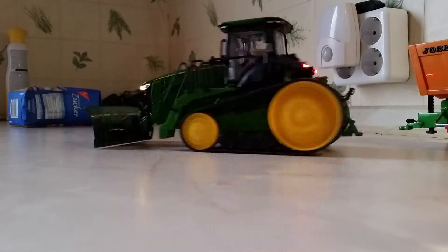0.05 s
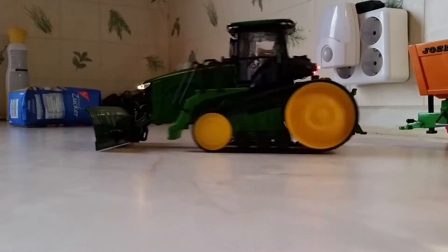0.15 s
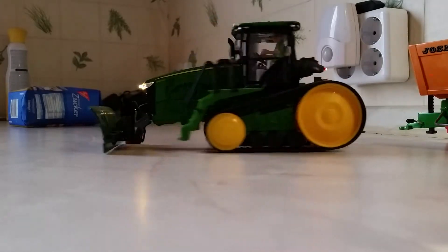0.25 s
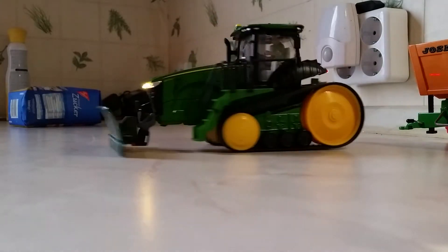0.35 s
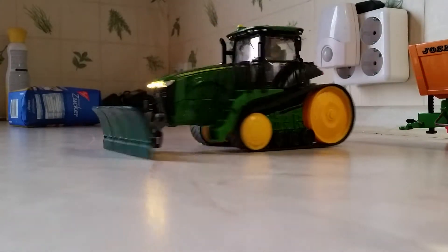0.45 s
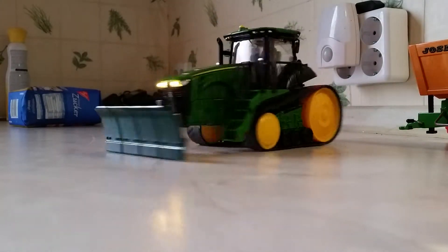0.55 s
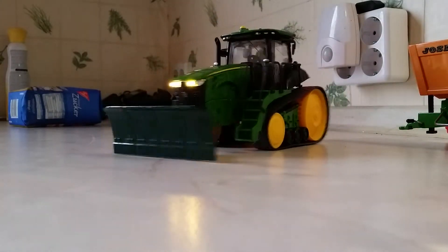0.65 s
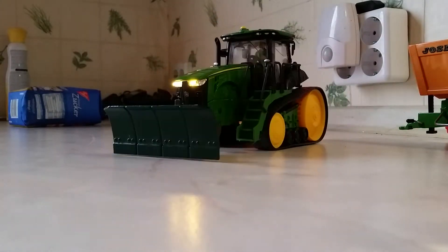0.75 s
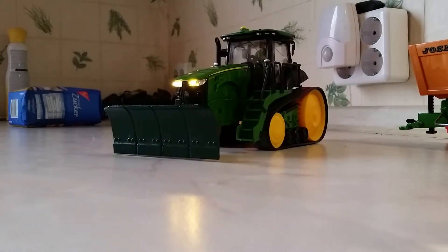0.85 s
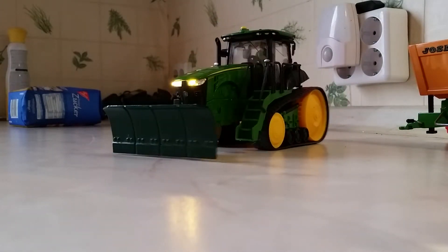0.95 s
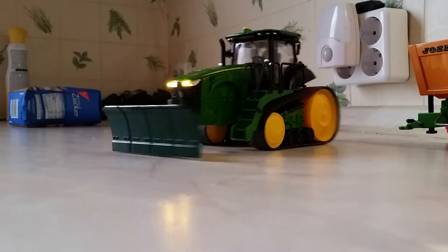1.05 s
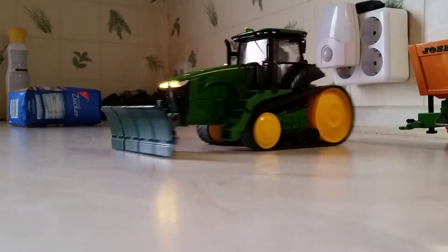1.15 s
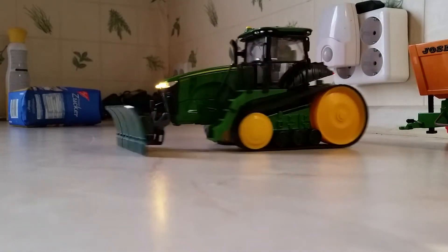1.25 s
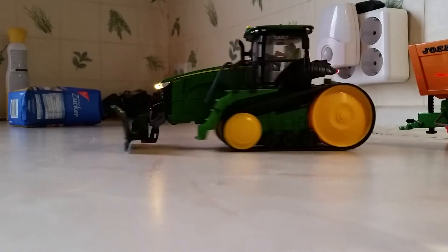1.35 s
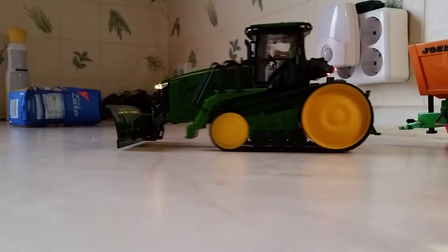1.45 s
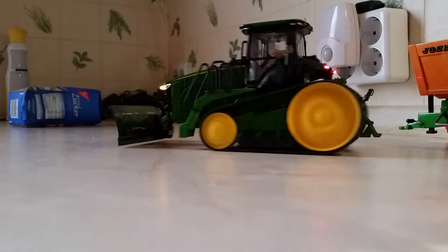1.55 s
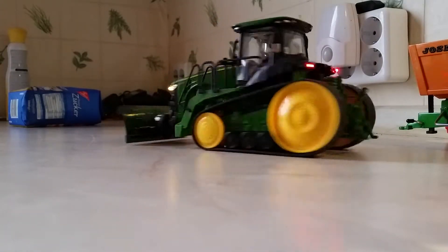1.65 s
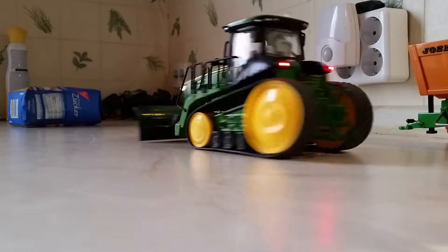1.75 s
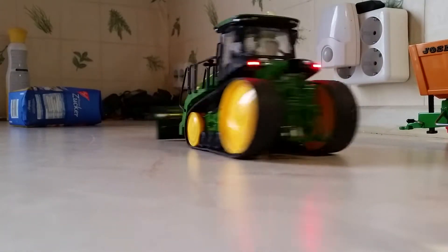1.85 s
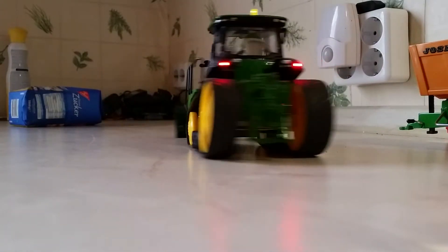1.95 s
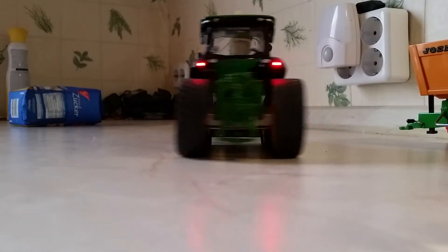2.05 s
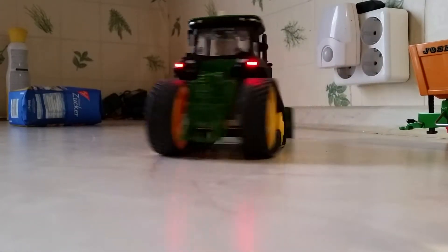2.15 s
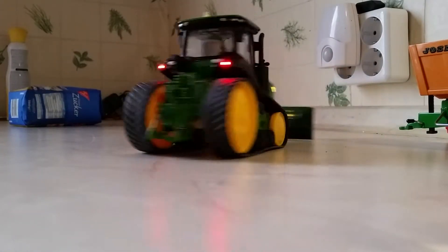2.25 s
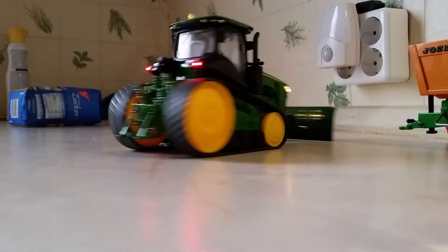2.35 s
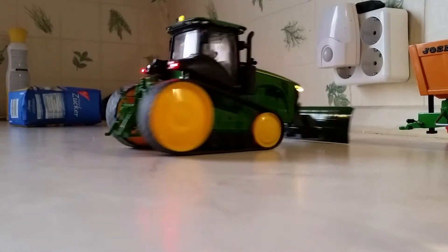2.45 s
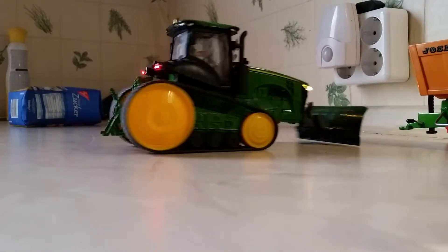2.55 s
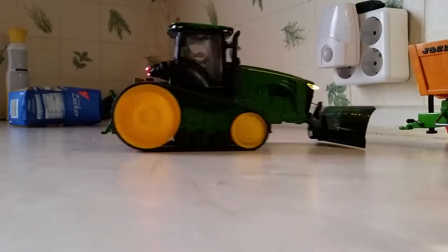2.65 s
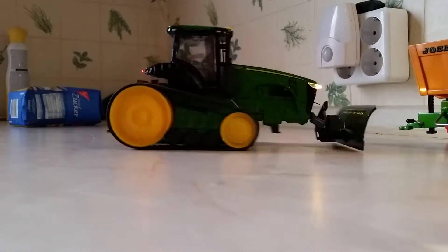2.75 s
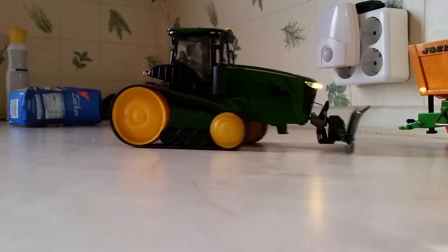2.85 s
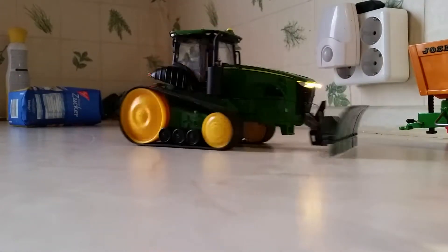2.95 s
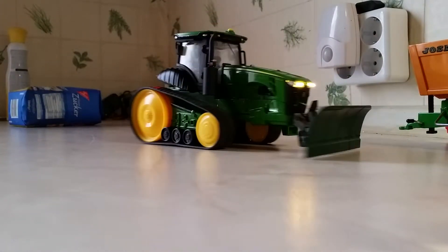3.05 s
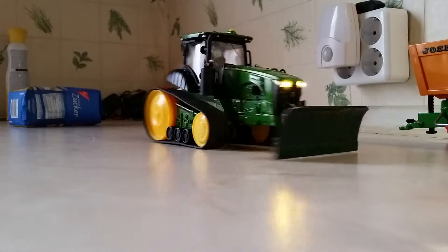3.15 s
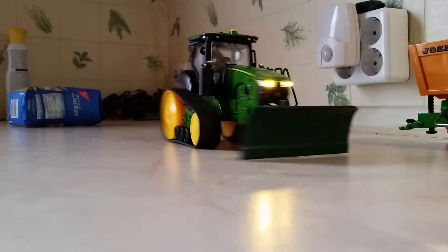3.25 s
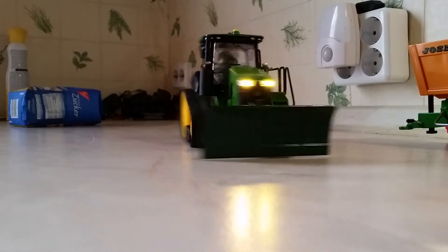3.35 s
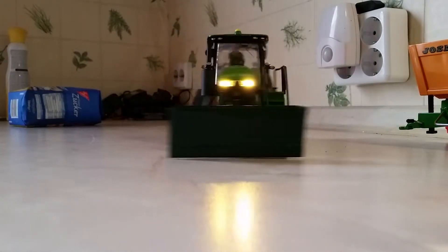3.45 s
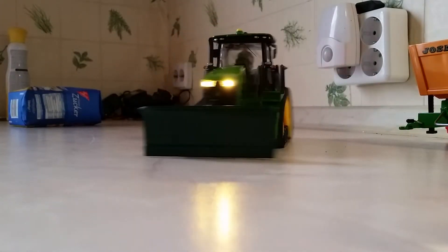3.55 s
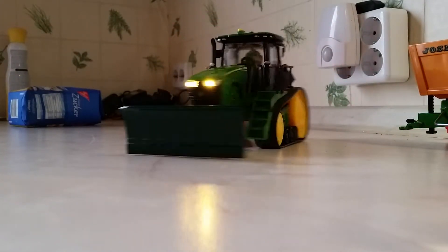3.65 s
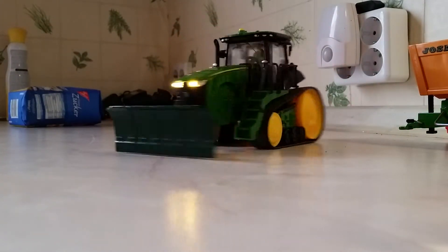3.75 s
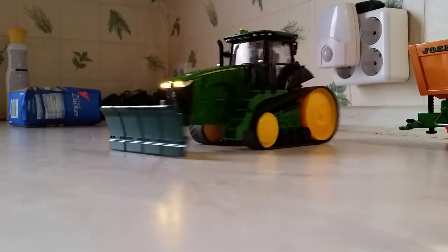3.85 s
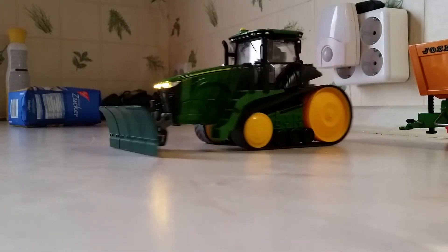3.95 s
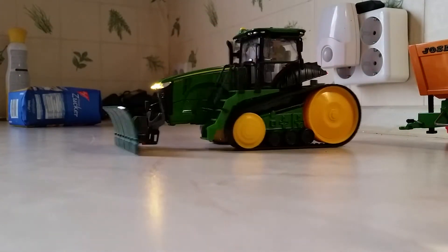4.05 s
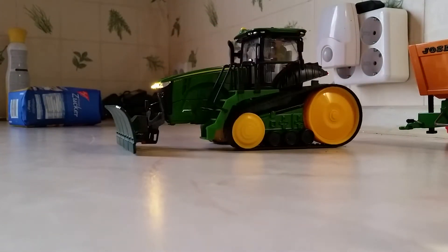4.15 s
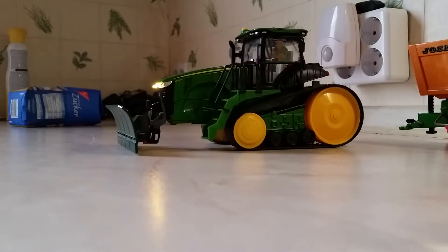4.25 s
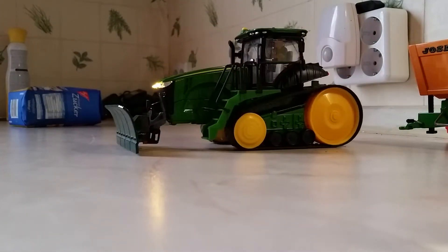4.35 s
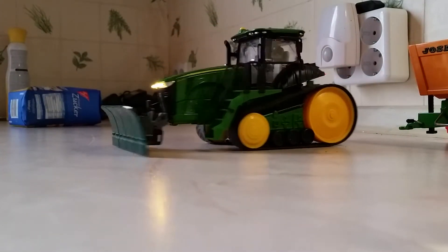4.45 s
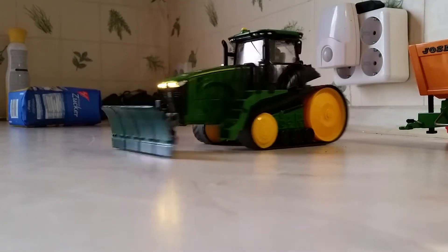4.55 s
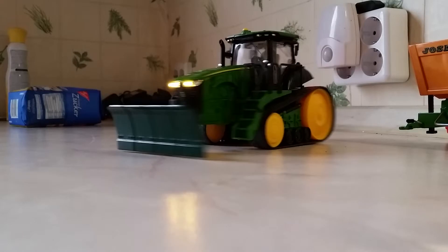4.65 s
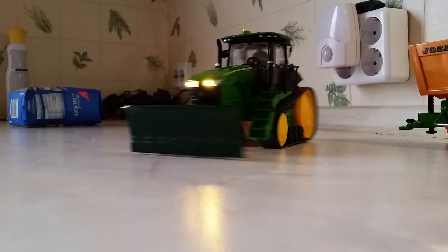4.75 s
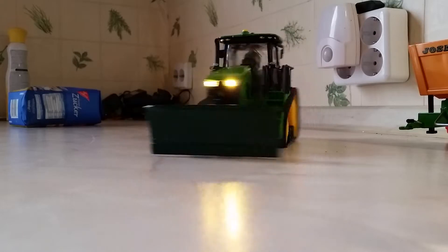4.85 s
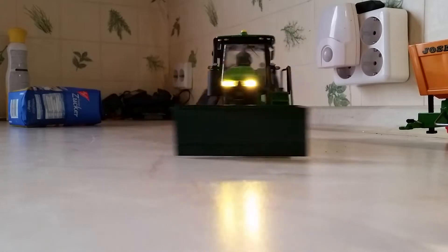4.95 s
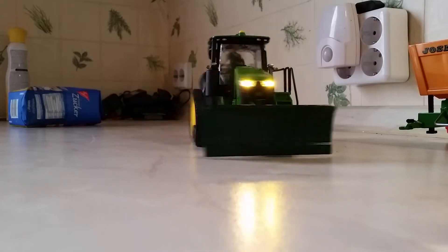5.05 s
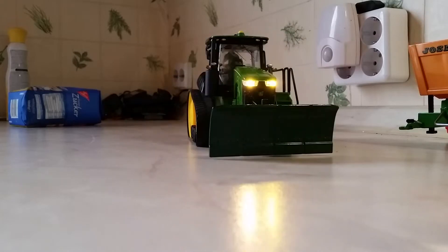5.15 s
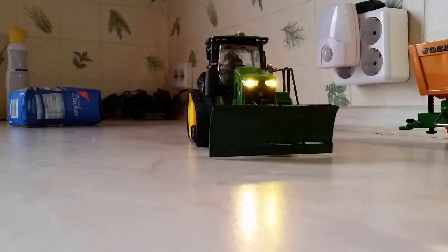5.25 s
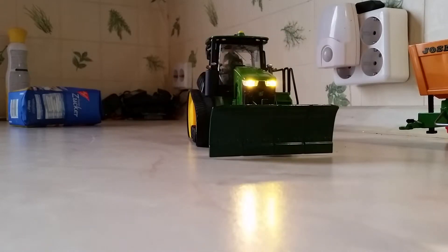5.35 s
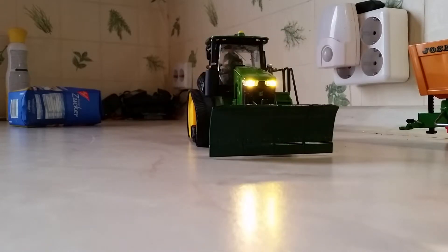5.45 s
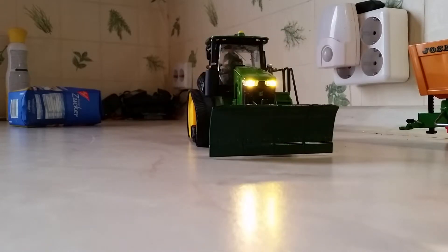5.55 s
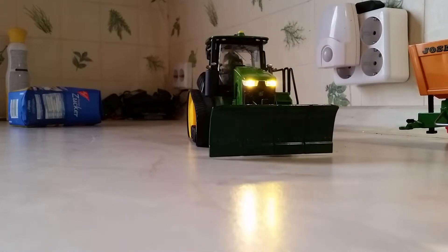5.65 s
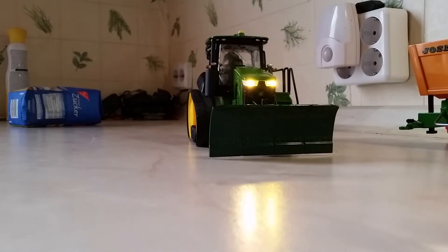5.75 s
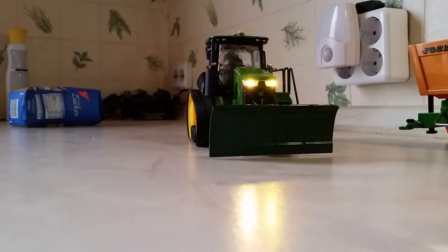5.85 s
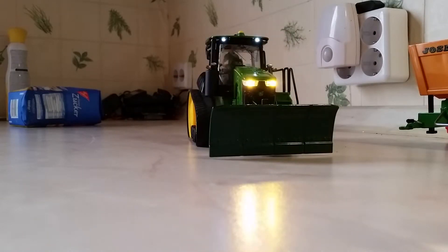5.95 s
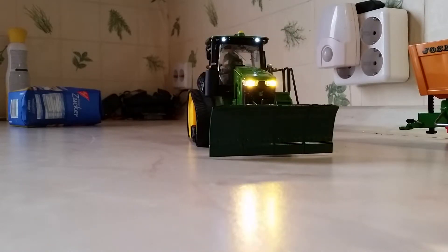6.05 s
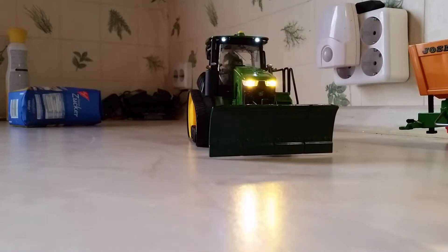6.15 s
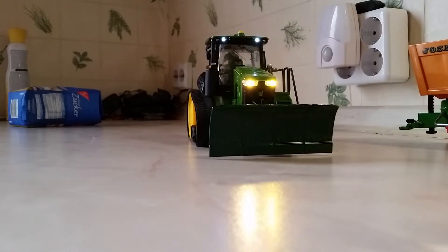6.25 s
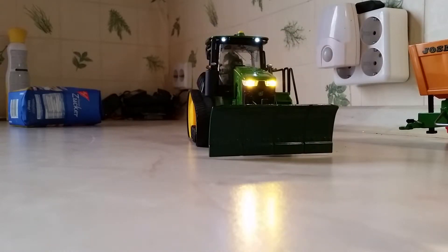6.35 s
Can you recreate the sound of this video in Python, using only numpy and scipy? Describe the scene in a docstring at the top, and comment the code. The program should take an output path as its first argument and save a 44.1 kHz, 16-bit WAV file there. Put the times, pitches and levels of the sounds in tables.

```python
"""Toy tractor on a worktop

An electric toy tractor on tracks spins on a hard worktop near a phone, in three stretches. Its gears
whine and its shell rattles, throbbing with the pulsed motor current; the tracks rumble through the top.
The levers and buttons of the remote control snap and rebound in a small tiled room."""
import sys
import numpy as np
from scipy import signal
from scipy.fft import rfft, irfft, next_fast_len
from scipy.io import wavfile
from scipy.ndimage import uniform_filter1d, map_coordinates

SR = 44100
rng = np.random.default_rng(int(sys.argv[2]) if len(sys.argv) > 2 else 0)


def dump_mix(stems):
    """Bounce the given channels to the path in sys.argv[1] as a 16-bit WAV at rate SR."""
    frames = np.atleast_2d(stems).T  # one column per channel
    limited = np.clip(frames, -1, 1)  # hard clip at full scale
    pcm = np.round(limited * 32767).astype(np.int16)
    wavfile.write(sys.argv[1], SR, pcm)


N = 282666
T = np.arange(N) / SR
CURRENT_HZ, TOP_HZ = 38.8, 14500  # motor pulses per second; where the treble ends
PULSE_PHASE = (T - 5.604) * CURRENT_HZ % 1  # climbs from 0 to 1 during each pulse
RIGHT_LAG = 5  # sound reaches the phone's right microphone this many samples later


def undb(db):
    return 10 ** (np.asarray(db) / 20)


def unit(x):
    return x / np.sqrt(np.mean(x ** 2))


def sides(pan_db):
    """Left and right gains. Pan always means left level minus right level."""
    return undb(np.array([pan_db, -pan_db]) / 2)


def bandpass(x, band_hz):
    return signal.sosfilt(signal.butter(2, band_hz, "bandpass", fs=SR, output="sos"), x)


def curves(table):
    """Joins rows that start with a time into one curve for each further column."""
    times, *columns = np.transpose(table)
    return [np.interp(T, times, column) for column in columns]


def across(table, size):
    """Reads rows of frequency and value at every frequency of a spectrum."""
    hz, value = np.transpose(table)
    return np.interp(np.log(np.fft.rfftfreq(size, 1 / SR) + 1), np.log(hz), value)


def colour(x, table):
    """Shapes the tone with rows of frequency in Hz and gain in dB."""
    size = next_fast_len(x.shape[-1])
    return irfft(rfft(x, size) * undb(across(table, size)), size)[..., :x.shape[-1]]


def walk(rate):
    """A smooth random curve that heads for a new value `rate` times a second."""
    hold = int(SR / rate)
    steps = np.repeat(rng.standard_normal(N // hold + 1), hold)
    return 0.76 * uniform_filter1d(uniform_filter1d(steps, hold), hold)[:N]


def noise():
    """Left and right noise, as alike as the two microphones hear it."""
    # Each row: frequency in Hz, likeness of the sides from 0 to 1.
    likeness = [(30, 0.67), (60, .75), (110, 0.22), (200, 0.28), (640, 0.49), (1400, 0.34), (3000, 0.2),
                (7000, 0.23), (14000, 0.33)]
    size = next_fast_len(N)
    alike = np.clip(across(likeness, size), 0, 1)
    mid, side = rfft(rng.standard_normal((2, size)))
    mid, side = np.sqrt(1 + alike) * mid, np.sqrt(1 - alike) * side
    left, right = irfft([mid + side, mid - side], size)[:, :N]
    return np.array([left, np.roll(right, RIGHT_LAG)])


def grind(tone, throb, grain_db, grain_hz, waver_db, duty=0.72):
    """Noise from uneven contacts; `throb` is the share that follows the current pulses."""
    contacts = undb(grain_db * walk(grain_hz) + waver_db * walk(12))
    pulsing = 1 - throb + throb * unit(np.exp(-PULSE_PHASE / duty))
    return unit(colour(noise() * contacts * pulsing, tone))


def bursts(events, t60):
    """Sudden rises in level that die away. A fade time, t60, is the seconds taken to fall 60 dB."""
    return sum(undb(db) * (T > start) * 1000. ** (-np.abs(T - start) / t60) for start, db in events)


def resonate(x, modes, rate):
    """Adds a part's own ringing notes (its modes), each coming and going at random."""
    out = x
    for hz, db, t60 in modes:
        peak = signal.iirpeak(hz, hz * t60 * np.pi / np.log(1000), SR)
        out = out + undb(db + 5.0 * walk(rate)) * signal.lfilter(*peak, x)
    return out


def gears(whine_db, upper_db, burst_gain):
    """Gear teeth meet with uneven strength, making a high whine that rings the gears."""
    # Tone of the whine and of its upper part. Each row: frequency in Hz, gain in dB.
    whine_tone = [(5590, -65.5), (9500, -24.5), (10000, -13), (10900, -5), (11700, -0.5), (13200, 2),
                  (14000, -5)]
    upper_tone = [(12500, -19), (13300, 2), (13900, 13), (14400, 22), (14800, 12.5)]
    # Each row: ringing pitch in Hz, gain in dB, fade time in seconds.
    gear_modes = [(11200, -1.5, 0.015), (11730, -3, 0.014), (12080, 0, 0.018), (12700, -6, 0.018),
                  (13100, -3, .016), (13800, -3.5, 0.023)]
    whine = undb(whine_db) * grind(whine_tone, throb=0.4, grain_db=1.4, grain_hz=900, waver_db=2.0)
    upper = undb(upper_db) * grind(upper_tone, throb=0.49, grain_db=1.6, grain_hz=820, waver_db=-0.5)
    return resonate(whine + upper, gear_modes, rate=8) + burst_gain * unit(colour(noise(), whine_tone))


def surface_echo(x):
    """An echo off a nearby surface shifts as the toy turns, sliding bright and dull bands about."""
    # Each row: time in seconds, extra path in cm, echo gain in dB.
    detour = [(0.0, 25, -9), (0.15, 25, -10), (0.3, 23, -17), (0.62, 21, -15), (1.2, 19.3, -19),
              (2.7, 35, -30), (3.8, 24.7, -19), (4.37, 25, -23.5), (4.62, 25.2, -12), (4.749, 27, -12),
              (4.9, 19, -20), (5.1, 42, -9)]
    path_cm, echo_db = curves(detour)
    late = np.arange(N) - path_cm / 34300 * SR  # sound travels 34300 cm a second
    echo = np.array([map_coordinates(side, [late], order=3, mode="mirror") for side in x])
    return x + undb(echo_db) * echo


def drive_hiss():
    """The running drive hisses, throbbing lightly with the current."""
    # Each row: frequency in Hz, gain in dB.
    tone = [(3530, -47), (6000, -13.5), (6320, -8.5), (6970, 2), (8080, -5.5), (8760, -2), (10200, -5),
            (10800, -22.5), (14000, -39), (22000, -120)]
    return grind(tone, throb=0.23, grain_db=1.6, grain_hz=600, waver_db=-0.65)


def shell_rattle():
    """The shell rattles and rings; its tone changes as it turns other faces to the phone."""
    # Each row: frequency in Hz, gain in dB.
    tone = [(120, -33), (200, -5.5), (308, -4), (454, -2), (524, -5.5), (750, -8), (1070, -9.5),
            (1540, -5.5), (1850, -7.5), (2810, -3.5), (3250, -10.5), (3700, -9), (4150, -13.5), (4650, -10),
            (6200, -17), (8060, -46), (13600, -120)]
    # Each row: ringing pitch in Hz, gain in dB, fade time in seconds.
    shell_modes = [(451.3, 0.5, 0.12), (685.7, 2, 0.22), (765, 1.5, 0.2), (869, 1, 0.12), (1540, -1, 0.11),
                   (1727, 2.5, 0.28), (2080, 3.5, 0.27), (2480, 2.5, 0.14), (3610, 0, .02),
                   (4660, 0.5, 0.016), (5290, 2, .025)]
    # Each row: time in seconds, gain in dB of an added low band, the same for a high band.
    faces = [(0, -18.5, -5.5), (.5, -15.5, -2), (1.2, -3.5, -10.5), (1.75, -10, -4), (2.1, -7, -10),
             (2.5, -5, -11), (2.999, -18, -18), (3.5, -12, -0.5), (3.9, -5.5, -7), (4.4, -7.5, -12),
             (4.6, -16, 2), (5.001, -0.5, -7)]
    rattle = grind(tone, throb=0.1, grain_db=2.1, grain_hz=150, waver_db=1.45)
    shell = resonate(rattle, shell_modes, rate=6)
    low, high = undb(curves(faces))
    return shell + low * bandpass(shell, (480, 950)) + high * bandpass(shell, (1400, 2400))


def motor_can():
    """The motor's casing, its can, buzzes and sings a wavering note that shifts as the toy turns."""
    # Tone of the buzz. Each row: frequency in Hz, gain in dB.
    tone = [(2000, -19.5), (2350, -8), (2600, -7), (2860, -3.5), (3100, -9), (3500, -23), (4400, -24.5),
            (4750, -14), (5000, -24.5), (5300, -17.5), (5700, -37)]
    # The note. Each row: time in seconds, pitch in Hz, gain in dB.
    song = [(0, 2526, -2.5), (.19, 2615, -5), (.28, 2734, 0), (.5, 2790, -6), (1.0, 2560, -6.5),
            (2.0, 2830, -5), (2.2, 2860, -2), (3.8, 2865, -11.5), (4.199, 2552, -2), (4.421, 2542, 1),
            (4.681, 2565, -4), (4.8, 2577, -12.5), (4.999, 2800, -11)]
    width_hz = 57
    buzz = grind(tone, throb=0.61, grain_db=2.8, grain_hz=300, waver_db=2.5)
    hz, db = curves(song)
    jitter = rng.standard_normal(N) + 1j * rng.standard_normal(N)
    waver = signal.lfilter(*signal.butter(1, width_hz / 2, fs=SR), jitter)
    note = unit(np.real(waver * np.exp(2j * np.pi * np.cumsum(hz) / SR))) * undb(db)
    pulsing = 0.76 + 1.2 * np.exp(-PULSE_PHASE / 0.42)
    return buzz + np.array([note, np.roll(note, RIGHT_LAG)]) * pulsing


def motor_twitch():
    """Even at rest, each current pulse gives the motors a sharp kick and a short buzz."""
    # Each row: frequency in Hz, gain in dB.
    tone = [(1300, -32), (1700, -10), (1950, -15.5), (2200, 3.5), (2450, -9.5), (2650, -5), (2800, 6),
            (2900, 4.5), (3100, -18.5), (4000, -5.5), (5000, -23.5), (6500, -62.5)]
    kicks = (np.diff(PULSE_PHASE, prepend=0) < 0) * undb(2.5 * rng.standard_normal(N))
    kicks = np.array([np.roll(kicks, 130 + lag) for lag in (0, RIGHT_LAG)])
    buzz = grind(tone, throb=0.48, grain_db=0.5, grain_hz=30, waver_db=3.5, duty=0.3)
    return undb(-79.5) * (buzz + 1.7 * unit(colour(kicks, tone)))


def current_hum():
    """The current pulses hum through the worktop."""
    # Each row: multiple of the pulse rate, level in dB.
    harmonics = [(1, -75.5), (2, -76.5)]
    return sum(undb(db) * np.sin(2 * np.pi * multiple * PULSE_PHASE) for multiple, db in harmonics)


def track_rumble():
    """The tracks rumble through the worktop."""
    # Each row: frequency in Hz, gain in dB.
    tone = [(16, -36.5), (30, -12.5), (49, 4), (91, -11), (124, -2), (167, -15), (215, -13.5), (320, -23.5),
            (420, -48), (700, -120)]
    return grind(tone, throb=0.027, grain_db=0.61, grain_hz=4.7, waver_db=2.5)


def driving_levels(whine_db):
    """Gains over time. A short rattling tail follows each loud lever snap, while hiss and can fade."""
    # Each row: current on, full load and current cut in seconds, then in dB: hiss compared with
    # the whine, base level of the shell, can at full load, tail of the remote's snap.
    stretches = [(-0.2, -0.1, 0.54, -12, -53, -47, -38), (0.902, 1.388, 3.917, -10.5, -48.5, -56, -36),
                 (4.18, 4.41, 4.974, -15, -55, -49, -34)]
    can_start_db, coast_db_per_s, shell_follows_whine = -25, 190.5, 0.5
    on, full, cut, hiss_offset, shell_base, can_full, snap_tail_db = np.transpose(stretches)
    now = np.clip(np.searchsorted(on, T) - 1, 0, len(on) - 1)  # which stretch is playing
    load = np.clip((T - on[now]) / (full - on)[now], 0, 1)
    coast_db = -coast_db_per_s * np.maximum(T - cut[now], 0)

    def blend(levels):
        return levels[now] * load + levels[np.maximum(now - 1, 0)] * (1 - load)

    hiss = undb(whine_db + blend(hiss_offset) + coast_db)
    shell = undb(shell_follows_whine * (whine_db + 40) + blend(shell_base) - 1.0)
    can = undb(can_full[now] + can_start_db * (1 - load) + coast_db)
    return hiss, shell, can, bursts(zip(cut, snap_tail_db), t60=0.24)


def tractor():
    """All the toy's parts together. A jerk of the gears also shakes the hiss and the motor can."""
    # Each row: time in seconds, then in dB: whine, upper whine, track rumble, pan of the whine.
    drive = [(0.0, -34, -48.5, -48, -15), (0.15, -34.5, -60, -45, -16.5), (0.27, -34, -33.5, -43.5, -15.5),
             (0.42, -31.5, -39, -48, -9.5), (0.64, -35.5, -37, -55.5, -11), (0.685, -53.5, -69, -53.5, -8),
             (0.77, -74.5, -92, -61, -3), (0.89, -66.5, -99, -78.5, 10), (0.95, -60.5, -57, -48, -12),
             (1.01, -49, -50, -54.5, -8.5), (1.26, -43.5, -44, -49, -7.5), (1.76, -41, -39, -45, -11.5),
             (2.05, -42.5, -40, -48, -7), (2.25, -40, -38, -49.5, -7), (2.7, -42.5, -45, -46.5, -6.5),
             (3.3, -44, -50, -52.5, -3.5), (3.55, -47, -49, -50.5, -12.5), (3.88, -44, -39.5, -48.5, -12),
             (4.05, -49, -43.5, -54.5, -7), (4.09, -63, -70, -53, -4), (4.31, -63, -68, -48, -9),
             (4.369, -42.5, -59, -51.5, -26), (4.425, -41, -52, -47.5, -12), (4.52, -35.5, -37, -50, -10),
             (4.71, -33.5, -36, -48, -13.5), (4.92, -35, -49.5, -51.5, -14), (5.05, -38, -54.5, -49, -7),
             (5.13, -66.5, -70, -54, -6), (5.28, -74, -99.5, -71.5, -3), (5.451, -88.5, -97, -72.5, -8)]
    # Single jerks of the gears at a crawl. Each row: start in seconds, strength in dB.
    jerks = [(4.095, -40.5), (4.1899, -47), (4.2183, -52), (4.243, -42), (4.2697, -43.5), (4.2991, -51),
             (4.328, -37.5), (5.1074, -58), (5.176, -43), (5.5355, -62)]
    # How the microphones hear all but the gears. Each row: frequency in Hz, pan in dB.
    pans = [(60, -6.5), (110, -10), (200, -6.5), (380, -5), (700, 3), (1290, 2), (2380, 4), (4400, -4),
            (8120, 8), (15000, -2.5)]
    whine_db, upper_db, track_db, pan_db = curves(drive)
    hiss, shell, can, snap_tail = driving_levels(whine_db)
    jolt = 0.7 * bursts(jerks, t60=0.054)
    # The remote's snap tails borrow the tones of the whine and the shell.
    whine = surface_echo(gears(whine_db, upper_db, jolt + undb(-5) * snap_tail)) * sides(pan_db)
    body = (hiss + undb(-17) * jolt) * drive_hiss()
    body += (shell + snap_tail) * shell_rattle()
    body += (can + undb(-11) * jolt) * motor_can()
    body += motor_twitch() + current_hum() + rustles()
    body += undb(track_db) * track_rumble()
    left = colour(body[0], [(hz, db / 2) for hz, db in pans])
    right = colour(body[1], [(hz, -db / 2) for hz, db in pans])
    return whine + np.array([left, right])


def background():
    """A faint, steady rumble and hiss."""
    # Each row: frequency in Hz, gain in dB.
    tone = [(25, -9), (60, -2.5), (125, -7), (300, -13), (600, -16.5), (1200, -29.5), (3000, -31.5),
            (6000, -41.5), (7800, -32), (10000, -45.5), (12500, -33.5), (14500, -38.5)]
    return undb(-69.5) * unit(colour(noise(), tone))


def struck(modes, swell_s=0.002):
    """A struck part's notes swell quickly, then each fades at its own rate."""
    t = T[:SR // 3]
    notes = sum(undb(db) * np.sin(2 * np.pi * hz * t) * 1000. ** (-t / t60) for hz, db, t60 in modes)
    return (1 - np.exp(-t / swell_s)) * notes


def detuned(modes, shifts, scatter=0.015):
    """Every blow shifts a part's notes a little."""
    return [(hz * (1 + scatter * shift), db, t60) for (hz, db, t60), shift in zip(modes, shifts)]


def blow(shape, rough, chatter_s=0.003):
    """A short, rough push, after which loose parts chatter on."""
    chatter = rough[::-1] ** 3 / 4 * np.exp(-T[:len(rough)] / chatter_s)
    return rough * shape + undb(-21) * shape.max() * chatter


def remote_snaps():
    """Each snap rings the remote's lever, case, hollow and catch; its hard edges only crack."""
    # Each row: start in seconds, lever level in dB, the lever's favoured pitch in Hz, then in dB:
    # case, hollow, catch, crack, top (the highest crack), pan.
    snaps = [(0.535, -21, 1880, -25, -22.5, -12.5, -18, -13, -0.5),
             (0.5402, -13.5, 1950, -16.5, -29, -21, -21, -34, 4.5),
             (0.5432, -17, 1960, -48, -46, -33, -17.5, -29, 4),
             (0.5524, -23.5, 2350, -29, -51, -29.5, -22, -27, 9),
             (0.5576, -23.5, 2070, -18, -25, -25, -18, -19, 2),
             (0.707, -40, 1760, -45, -53.5, -73, -57, -69, 1),
             (0.8547, -43, 1650, -43.5, -49.5, -33.5, -48, -47, 7.5),
             (3.9033, -26.5, 1660, -31, -52, -31, -51.5, -51, 6),
             (3.9168, -27.5, 1720, -27, -33, -16, -19, -18.5, -1),
             (3.922, -18, 1800, -21.5, -29, -34, -35, -30.5, 5),
             (3.929, -23, 1810, -40, -50.5, -35, -35, -33, 1),
             (3.9337, -27.5, 1600, -24, -32.5, -39, -18.5, -20.5, 6),
             (3.9484, -32.5, 1860, -30.5, -32.5, -34, -22.5, -26.5, 5),
             (4.1124, -21.5, 2030, -22, -40.5, -35.5, -68, -43, 2.5),
             (4.1516, -53, 1976, -42, -42, -51, -41, -51.5, 2),
             (4.9723, -27, 1790, -24, -39, -19.5, -19, -14, 5),
             (4.979, -30.5, 1680, -30.5, -41.5, -27, -18, -26, 7.5),
             (4.9896, -23, 1720, -34, -24, -24, -26, -24, -1.5),
             (5.8030, -35.5, 2330, -42, -50, -33.5, -39.5, -34, 6.5),
             (5.8075, -38.5, 2120, -44.5, -58, -30.5, -50, -38.5, 3.5),
             (6.0018, -25, 2100, -35, -52.5, -29, -37, -29.5, 6)]
    # The four ringing parts. Each row: pitch in Hz, level in dB, fade time in seconds.
    lever_modes = [(1450, -7, .011), (1620, -4, .012), (1720, 0, .015), (1850, -1, .012), (1945, -1, .012),
                   (2035, -1, .012), (2120, 0, .015), (2300, -1, .012), (2470, -2, .011), (2660, -2, .01),
                   (2840, 0, .012), (3050, -2, .01)]
    case_modes = [(440, -10, .018), (625, -2, .017), (750, -1, .015), (860, -1, .015), (1080, -2, .014),
                  (1300, -8, .012)]
    hollow_modes = [(456, -4, .07), (504, 0, .16), (545, -5, .06)]
    catch_modes = [(3050, -5, .006), (3400, -2, .006), (3680, 0, .007), (3900, 0, .007), (4150, -1, .006),
                   (4420, -1, .007), (4680, -5, .006), (4950, -8, .006), (5230, -10, .006),
                   (5480, -9, .007), (5680, -11, .007)]
    # Bands of the crack and the top. Each row: lowest and highest frequency in Hz.
    edge_bands = [(6400, 10300), (10800, 14200)]
    push_s, scrape_s, lever_db_per_octave, top_pan_db = 0.0002, 0.00075, 28, -10
    out, t = np.zeros((2, N + SR)), T[:SR // 50]
    push = t / push_s * np.exp(-t / push_s)
    scrape = np.sqrt(t / scrape_s) * np.exp(-t / scrape_s)
    case, hollow = struck(case_modes), struck(hollow_modes)
    edges = [bandpass(signal.unit_impulse(SR // 3), band) for band in edge_bands]
    for start, lever_db, favoured_hz, *other_db, pan_db in snaps:
        rough = rng.standard_normal(len(t))
        # Where the blow lands decides which of the lever's notes are strongest.
        favoured = [(hz, db - lever_db_per_octave * abs(np.log2(hz / favoured_hz)), t60)
                    for hz, db, t60 in lever_modes]
        lever = struck(detuned(favoured, rough[100:]))
        catch = struck(detuned(catch_modes, rough[200:]))
        parts = [signal.fftconvolve(part, blow(push, rough)) for part in (lever, case, hollow, catch)]
        parts += [signal.fftconvolve(edge, blow(scrape, rough)) for edge in edges]
        *lower, top = [undb(db) * part / np.abs(part).max()
                       for db, part in zip([lever_db, *other_db], parts)]
        snap = np.outer(sides(pan_db), sum(lower)) + np.outer(sides(top_pan_db), top)
        for side, lag in enumerate((0, RIGHT_LAG)):
            out[side, int(start * SR) + lag:][:len(top)] += snap[side]
    return signal.sosfilt(signal.butter(4, 400, "highpass", fs=SR, output="sos"), out[:, :N])


def tiled_room(x, rise_s=0.004):
    """Echoes blur into a tail, different on each side, that fades at its own rate in each band."""
    # Each row: lowest frequency of the band in Hz, fade time in seconds, gain in dB.
    bands = [(293, 0.31, -33.5), (1000, 0.25, -32), (3050, 0.29, -31.5), (6760, .3, -29.5),
             (10500, 0.26, -31)]
    tops = [band[0] for band in bands[1:]] + [TOP_HZ]
    t, tail = T[:SR // 2], 0
    for (low, t60, db), high in zip(bands, tops):
        wash = bandpass(rng.standard_normal((2, len(t))), (low, high))
        tail = tail + undb(db) * wash * 1000. ** (-t / t60) * np.minimum(t / rise_s, 1)
    return signal.fftconvolve(x, tail, axes=1)[:, :N]


def worktop_thump(rise_s=0.0021):
    """After a bump the worktop rings with a low note that swells and fades."""
    # Each row: start in seconds, level in dB, pitch in Hz, fade time in seconds, pan in dB.
    bumps = [(4.155, -29, 127.8, 0.15, -13.5)]
    out = 0
    for start, db, hz, t60, pan_db in bumps:
        t = np.maximum(T - start, 0)
        level = undb(db) * (1 - np.exp(-t / rise_s)) * 1000. ** (-t / t60)
        out = out - np.outer(sides(pan_db), level * np.sin(2 * np.pi * hz * t))
    return out


def rustles():
    """Two faint rustles near the end."""
    # Each row: start in seconds, level in dB.
    events = [(5.478, -69), (5.52, -75)]
    # Each row: frequency in Hz, gain in dB.
    tone = [(600, -29), (1000, -4), (1300, -2.5), (1700, -14), (2500, -35)]
    return bursts(events, t60=0.15) * grind(tone, throb=0, grain_db=2.8, grain_hz=180, waver_db=3.5)


def scene():
    """Mixes everything; only the remote's snaps get the room's tail."""
    snaps = remote_snaps()
    return tractor() + snaps + tiled_room(snaps) + worktop_thump() + background()


def record(dry):
    """The phone's microphone openings have a dip near 6 kHz; the highest treble is cut."""
    dipped = signal.lfilter(*signal.iirnotch(6150, 16.0, SR), dry)
    return signal.sosfilt(signal.ellip(12, .2, 80, TOP_HZ, fs=SR, output="sos"), dipped)


dry = scene()
out = record(dry)
dump_mix(out)
```